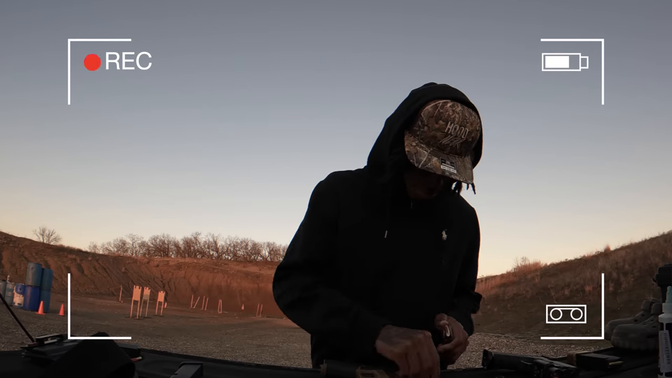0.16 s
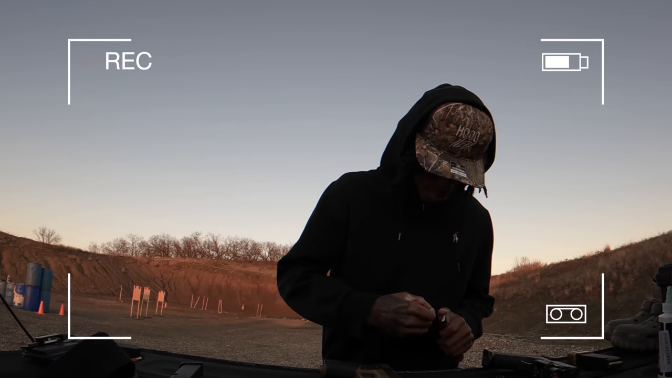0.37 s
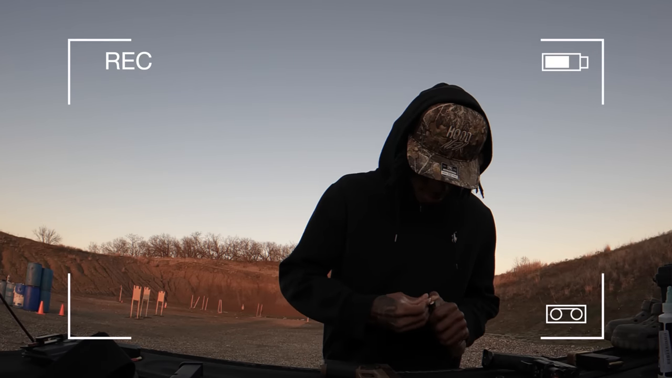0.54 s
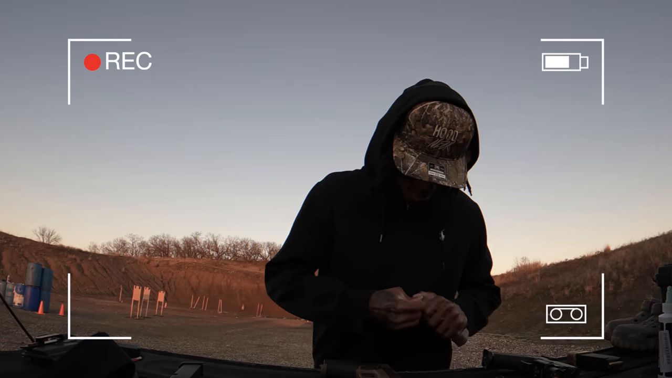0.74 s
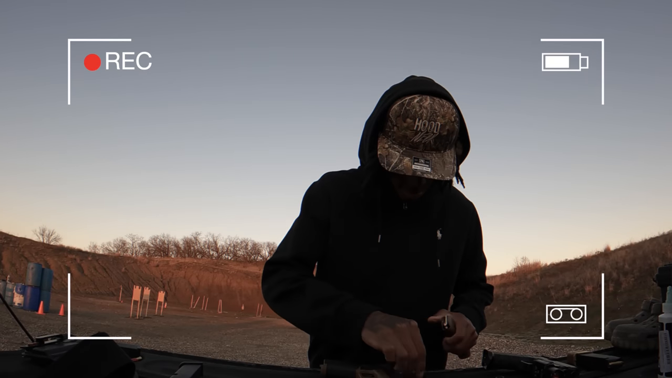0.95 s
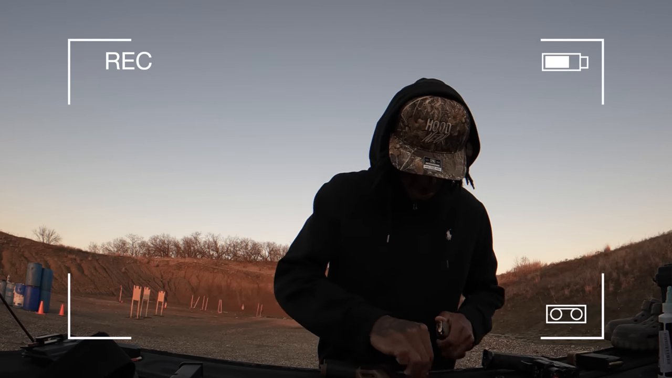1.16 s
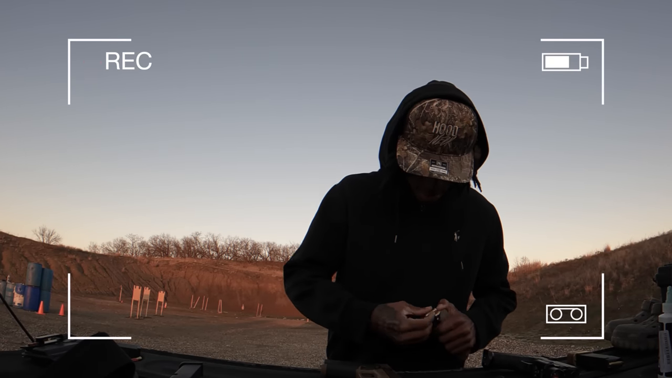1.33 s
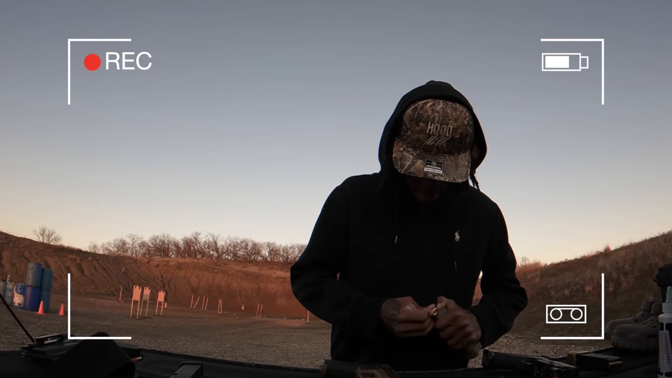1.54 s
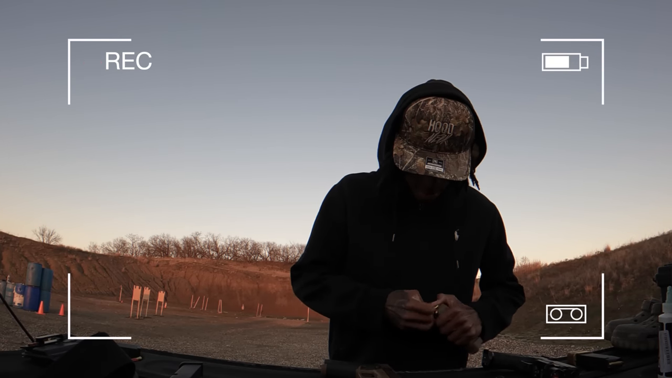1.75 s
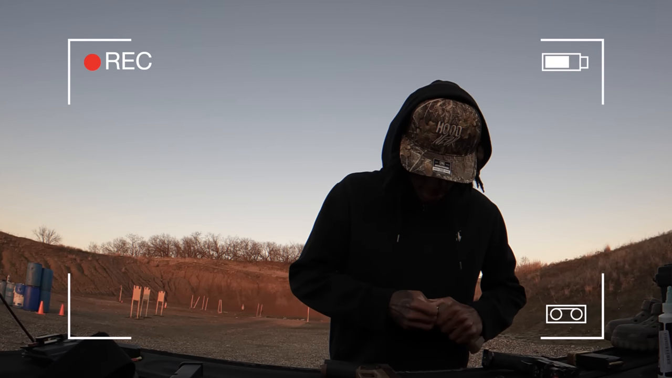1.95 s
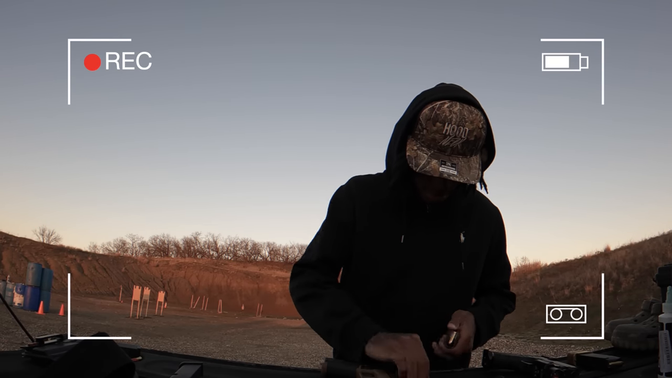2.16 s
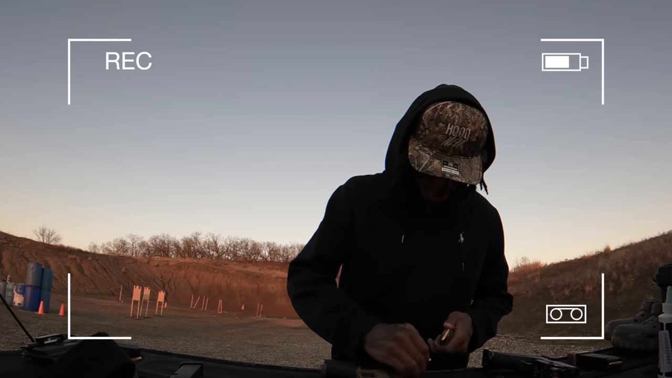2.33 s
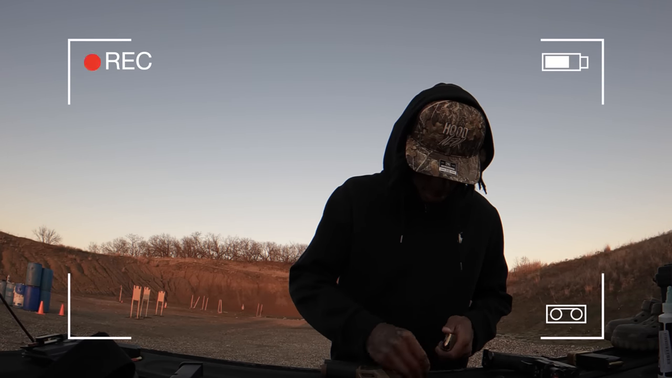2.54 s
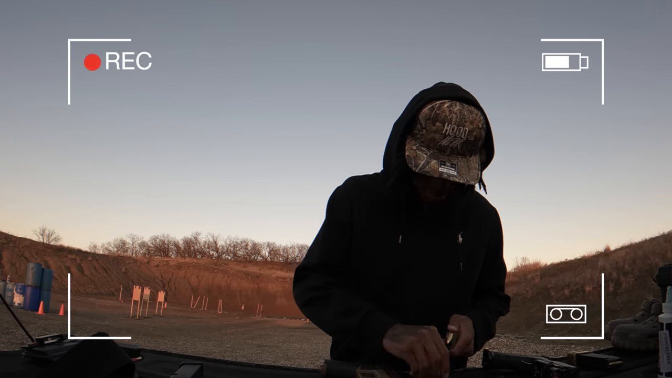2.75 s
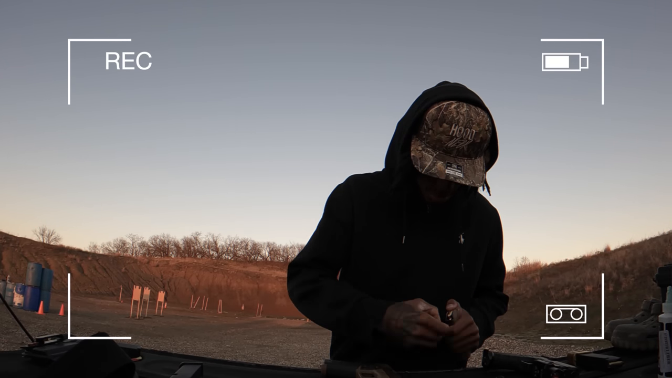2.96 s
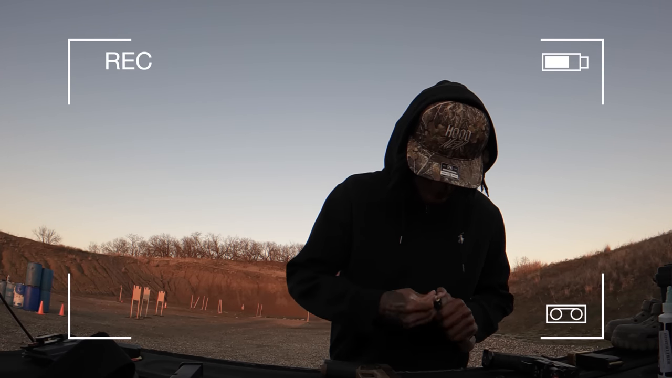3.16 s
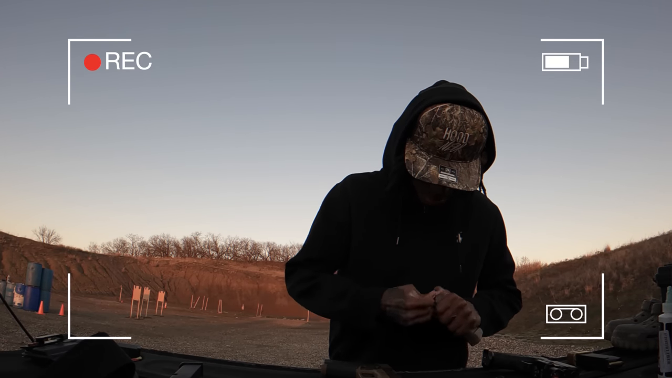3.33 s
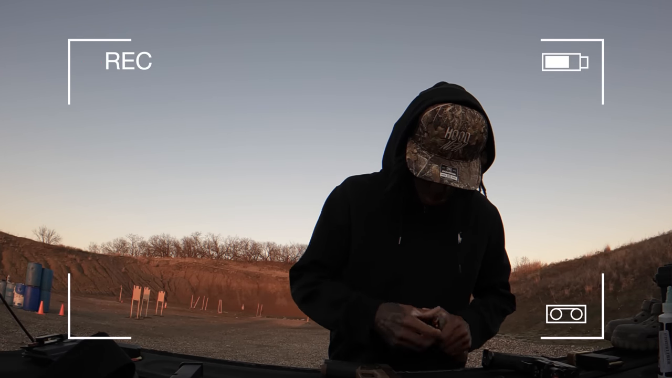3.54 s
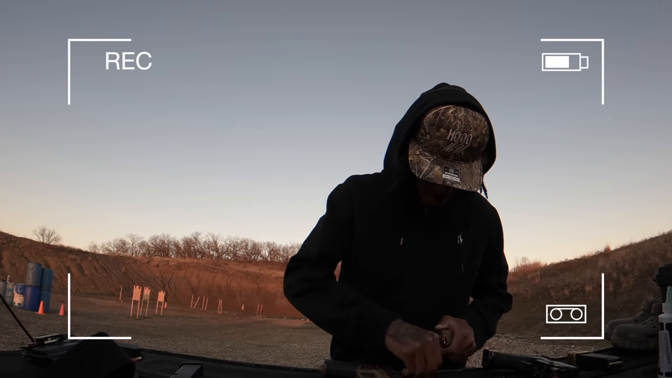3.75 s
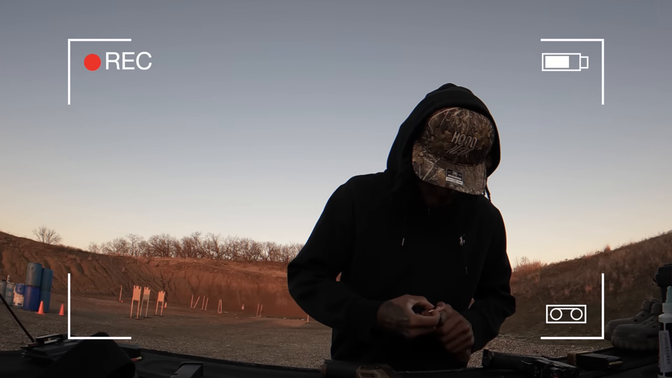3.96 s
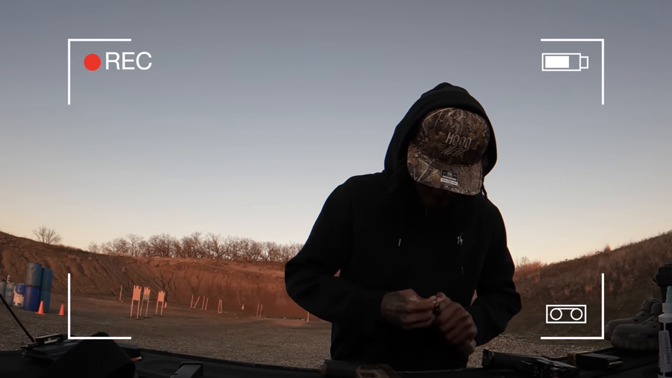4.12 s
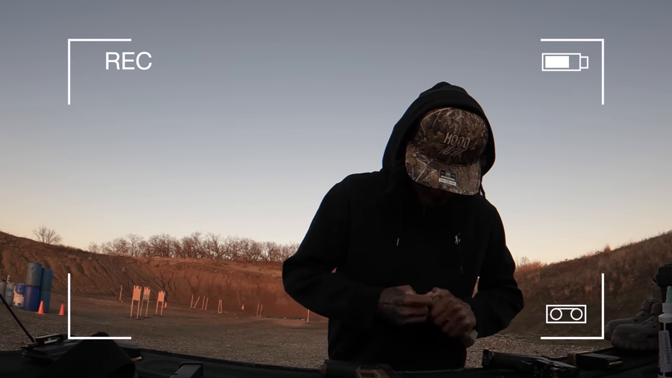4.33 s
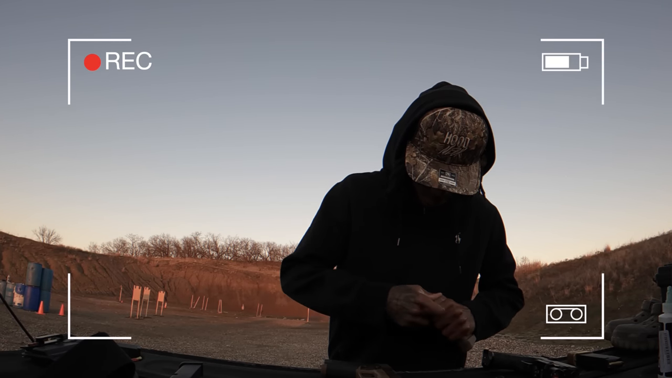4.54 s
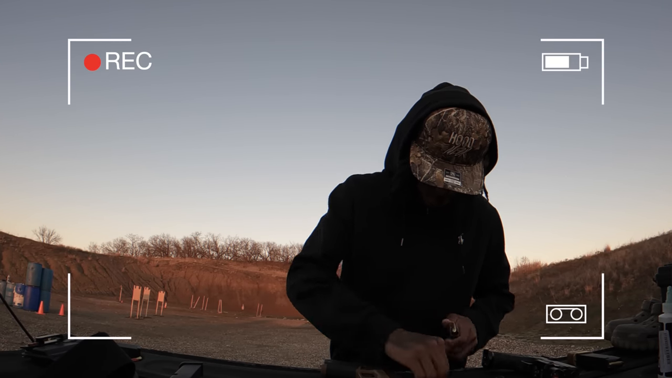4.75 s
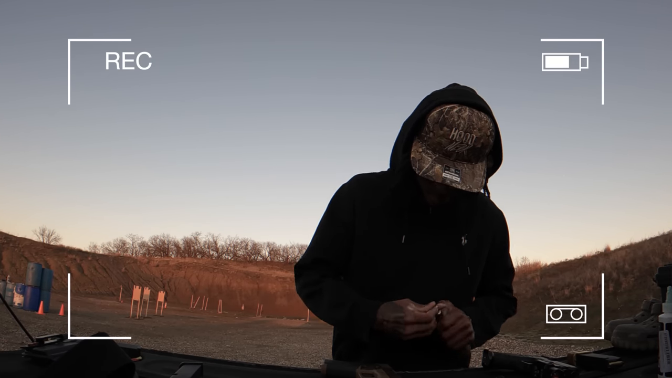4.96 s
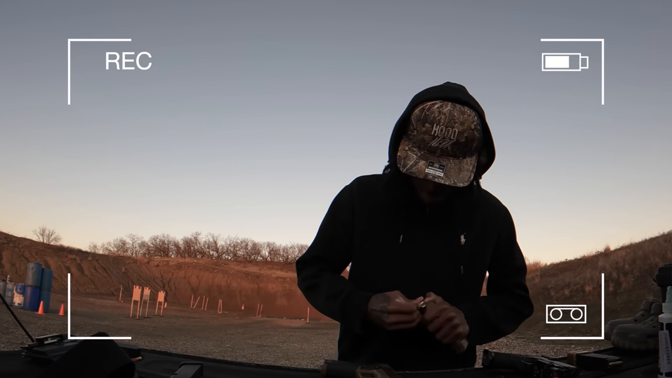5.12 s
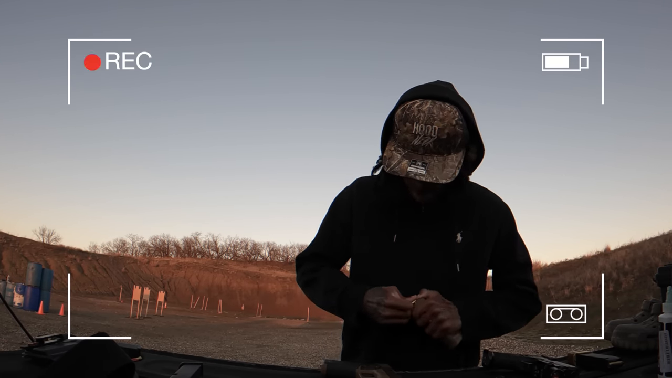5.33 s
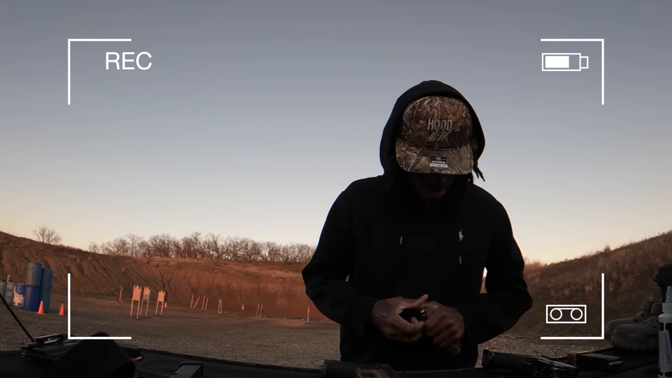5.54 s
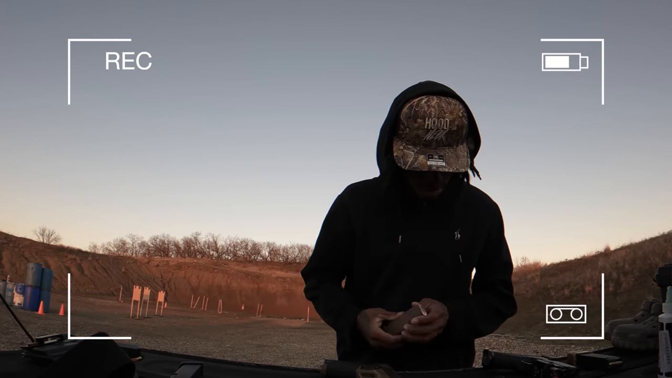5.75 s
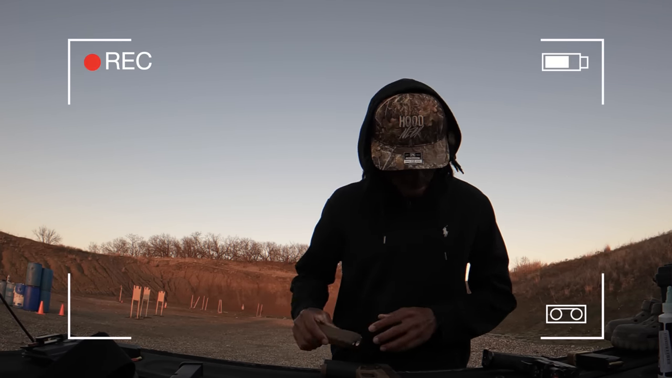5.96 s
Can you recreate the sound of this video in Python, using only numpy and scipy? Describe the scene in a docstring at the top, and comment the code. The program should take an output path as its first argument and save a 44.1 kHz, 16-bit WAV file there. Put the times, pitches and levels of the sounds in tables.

```python
"""Outdoor range, one microphone on a hollow truck bed, close to hands loading a pistol magazine.
From the start, low air rumble, a small engine far off and a faint cricket trilling with short pauses.
Cartridges are thumbed in one by one: brass scrapes along the feed lips and snaps in. Between rounds
the hand fetches the next one and knocks on the bed. The loudest knock and snap land together near
2.6 s; lighter ones follow, and the last ticks of brass come just before 6 s."""
import sys
import numpy as np
from scipy import signal
from scipy.fft import rfft, irfft, next_fast_len
from scipy.io import wavfile
from scipy.ndimage import uniform_filter1d

SR = 44100
rng = np.random.default_rng(int(sys.argv[2]) if len(sys.argv) > 2 else 0)


def inscribe(sig):
    """Save sig as 16-bit PCM at rate SR to the path in sys.argv[1].

    A 1-D sig is mono; a 2-D sig holds one channel per row.
    Samples are clipped to [-1, 1] before scaling.
    """
    pcm = np.round(np.clip(np.atleast_2d(sig).T, -1, 1) * 32767)
    wavfile.write(sys.argv[1], SR, pcm.astype(np.int16))


N = 264024
T = np.arange(N) / SR

# rumble of the open air: f/Hz, relative level/dB
AIR_SPECTRUM = [(10, -12.5), (22, 3), (45, 1), (80, 4), (100, -0.5), (130, -7), (200, -12), (350, -18.5),
                (430, -25.5), (560, -36), (1500, -49.5), (3500, -68), (7000, -75), (15000, -82)]
# soft rush in the distance: f/Hz, relative level/dB
RUSH_SPECTRUM = [(200, -26.5), (480, -8), (650, 7), (830, 8), (1050, -2.5), (1400, -7), (2200, -32.5),
                 (5000, -48.5)]
# swells of the rush: peak t/s, level/dB, attack/s, release/s
RUSH_SWELLS = [(0.51, -63.5, 0.07, 0.13), (2.7, -65.5, 0.054, 0.054), (3.55, -71, 0.12, 0.12),
               (4.119, -65.5, 0.072, 0.36)]
# the rush dying down beneath its swells: t/s, level/dB
RUSH_FLOOR = [(0, -75.5), (2.4, -76.5), (3.1, -86), (5.99, -92)]
# firing harmonics of the far engine: multiple, level/dB
ENGINE_HARMONICS = [(1, -61.5), (2, -62.5), (3, -55), (4, -62), (5, -76.5), (6, -85)]
# middle of each pause in the cricket's trill: t/s
CRICKET_PAUSES = [1.052, 1.518, 2.134, 2.5, 2.962, 3.332, 4.031, 4.995, 5.405, 5.97]
# resonance of the cricket's wing: f/Hz, relative level/dB
WING_SPECTRUM = [(3900, -47), (4400, -11), (4630, 3), (4870, 7.5), (5120, -21), (5700, -37.5)]
# skin and cloth rubbing: f/Hz, relative level/dB
RUB_SPECTRUM = [(400, -11.5), (900, 3), (2500, 1), (4000, -3.5), (7000, -5.5), (9000, -15.5),
                (12500, -23), (16000, -43.5)]
# fingers tightening on a round: peak t/s, relative level/dB
FINGER_GRIPS = [(0.02, -76), (0.57, -74), (0.72, -76), (0.87, -68.5), (1.6, -80.5), (2.0, -74.5),
                (2.14, -86), (3.13, -84.5), (3.48, -77.5), (4.3, -81.5), (4.63, -74), (5.31, -80.5),
                (5.55, -77.5), (5.8, -76.5)]
# knocks on the bed: t/s, relative level/dB, hardness/(dB per octave), favoured f/Hz,
# ring time as a share of the free bed's, number of rebounds
BED_KNOCKS = [(0.23, -27, -6, 150, 0.9, 0), (0.248, -26.5, -3.5, 170, 1.1, 2),
              (0.331, -36.5, -6, 410, 0.78, 0), (0.359, -37.5, -6.5, 320, 1.03, 0),
              (1.096, -32, -6, 170, 0.34, 0), (1.116, -34, -4, 780, 0.84, 0),
              (1.151, -29.5, -3, 780, 0.47, 0), (1.162, -22, -4.5, 694, 0.74, 2),
              (1.316, -38.5, -5, 294, 0.74, 0), (1.378, -37, -6.5, 207, 0.77, 0),
              (1.946, -47.5, -6.5, 408, 1.4, 0), (2.206, -29.5, -5.5, 286, 0.96, 2),
              (2.264, -29.5, -5, 780, 0.65, 0), (2.582, -15.5, 0.07, 1400, 0.73, 0),
              (2.594, -16, -0.9, 200, 0.54, 1), (2.631, -22.5, -3.5, 1000, 0.9, 0),
              (2.858, -39, -4, 1370, 1.1, 0), (2.867, -26, -3.5, 148, 0.93, 0),
              (2.902, -43, -2, 1490, 1.03, 0), (2.944, -41.5, -9.5, 408, 0.86, 0),
              (3.699, -30, -6, 720, 1.07, 0), (3.726, -34, -4, 660, 0.88, 0),
              (4.753, -32, -3, 480, 0.85, 0), (4.765, -24, -6, 480, 0.62, 1)]
# modes of the bed: f/Hz, relative level/dB
PANEL_MODES = [(168, -0.5), (200, 1.5), (294, 2.5), (328, -3.5), (403, -2.5), (461, -6), (587, 0),
               (624, -10), (810, 0), (864, -4), (1005, -3.5), (1164, -7.5), (1305, -8.5), (1404, -9.5),
               (1504, -5.5), (1836, -17.5), (1975, -16), (2250, -9)]
# dense rattle of the bed's panels: f/Hz, relative level/dB
PANEL_SPECTRUM = [(40, -45.5), (115, -21), (175, -3), (320, -2), (600, 0), (1000, -6), (1500, -12),
                  (2400, -11.5), (3900, -18), (6000, -18.5), (7500, -24), (8800, -43.5), (15000, -57)]
# ring time of the free bed: f/Hz, t60/s
PANEL_T60 = [(150, 0.15), (700, 0.16), (2000, 0.13), (6000, 0.052)]
# modes of the hand-held magazine: f/Hz, relative level/dB, t60/s
MAGAZINE_MODES = [(800, -3.5, 0.032), (1300, -13.5, 0.017), (1905, -4.5, 0.019), (2450, -6, 0.018),
                  (3029, -4, .028), (4080, -2, 0.013), (4640, 2.5, 0.015), (5100, -2.5, 0.022),
                  (5690, -8.5, 0.031), (6480, -6, 0.012), (7190, -5.5, 0.018), (8800, -13, .008),
                  (12400, -19.5, .012)]
# crack of brass meeting the magazine: f/Hz, relative level/dB
CRACK_SPECTRUM = [(150, -25), (550, -14.5), (830, -0.5), (1400, -7), (2700, -1), (3500, -3), (4600, 0),
                  (6800, -7.5), (7800, -11.5), (9500, -13), (11000, -19.5), (13000, -23), (16000, -37)]
# a case sliding without snapping in: start t/s, length/s, relative level/dB
LONE_SLIDES = [(0.002, 0.029, -46.5), (0.582, 0.034, -69), (0.683, 0.022, -67), (0.85, 0.032, -55),
               (4.628, 0.029, -67)]
# snaps and ticks of brass: t/s, relative level/dB, brightness/(dB per octave), favoured f/Hz,
# relative level of the slide around it/dB
BRASS_CLICKS = [(0.0376, -37, 2.5, 1770, -79), (0.2484, -47.5, 0, 7500, -66), (0.536, -47, 0, 1830, -66.5),
                (0.632, -43.5, 3.5, 3260, -67), (0.812, -34.5, 5.5, 5230, -52.5),
                (0.8249, -38, -2, 1910, -55), (0.9077, -39.5, -3, 8400, -58.5), (1.15, -42, 1, 1440, -56.5),
                (1.4071, -47, 2.5, 1920, -66.5), (1.522, -62.5, 5, 1430, -80), (1.725, -61, 1.5, 1420, -71),
                (1.9077, -32.5, -4, 2380, -72), (1.9166, -44, -3, 2030, -70),
                (2.018, -42, 0.5, 4000, -52.5), (2.0244, -43.5, -1.5, 3940, -65),
                (2.0837, -51, -7, 870, -64), (2.2034, -50, -3, 1430, -66.5), (2.5828, -23, -4.5, 5900, -57),
                (3.103, -52, -0.5, 5300, -67), (3.2576, -63, -0.5, 5000, -77), (3.357, -65, 0.5, 1430, -78),
                (3.4191, -36, 4.5, 3860, -58), (3.428, -44.5, -4, 6500, -78),
                (3.537, -40.5, 2, 4330, -56.5), (3.5558, -51.5, 2, 1815, -68),
                (4.0243, -62.5, -6, 3600, -68.5), (4.3226, -45, 2.5, 6720, -67),
                (4.486, -45, -6, 920, -61.5), (4.5467, -52.5, -2.5, 2510, -65.5),
                (4.5728, -47.5, 0, 2900, -74), (4.5874, -31.5, 0, 2730, -67),
                (5.295, -53.5, 3, 7700, -63.5), (5.4093, -46.5, -3, 2480, -70), (5.486, -42, -2, 2320, -55),
                (5.508, -37.5, 0.5, 2720, -59.5), (5.5671, -61, 2.5, 4330, -71.5),
                (5.7996, -56, -6, 2060, -75.5)]


def undb(db):
    """Decibels to gain."""
    return 10 ** (np.asarray(db) / 20)


def unit(x):
    """Scale to rms 1."""
    return x / np.sqrt(np.mean(x ** 2))


def at_level(x, db, size):
    """Scale x so that its first size samples have an rms level of db."""
    return x * undb(db) / np.sqrt(np.mean(x[:size] ** 2))


def add(out, s, x):
    """Mix x into out from time s."""
    i = max(int(s * SR), 0)
    out[i:i + len(x)] += x[:N - i]


def on_log_axis(points, hz):
    """Rows of (f/Hz, value) read on a log-frequency axis."""
    freqs, values = np.transpose(points)
    return np.interp(np.log(np.maximum(hz, 1)), np.log(freqs), values)


def colour(x, points):
    """Minimum-phase filter through rows of (f/Hz, level/dB)."""
    size = 2 * next_fast_len(len(x))
    hz = np.arange(size // 2 + 1) * SR / size
    cepstrum = irfft(np.log(undb(on_log_axis(points, hz))))
    cepstrum[1:size // 2] *= 2
    cepstrum[size // 2 + 1:] = 0
    return irfft(rfft(x, size) * np.exp(rfft(cepstrum)))[:len(x)]


def tilt(x, slope, low_hz, high_hz):
    """Lean the spectrum by slope dB per octave between two corners."""
    return colour(x, [(low_hz, 0), (high_hz, slope * np.log2(high_hz / low_hz))])


def favour(x, hz, db, q):
    """Lift one resonance by db."""
    return x + (undb(db) - 1) * signal.lfilter(*signal.iirpeak(hz, q, fs=SR), x)


def noise(points, size=N):
    """Coloured noise of rms 1."""
    return unit(colour(rng.standard_normal(size), points))


def drift(rate_hz):
    """Smooth random wavering of rms 1."""
    hold = int(SR / rate_hz)
    steps = np.repeat(rng.standard_normal(N // hold + 1), hold)
    return unit(uniform_filter1d(uniform_filter1d(steps, hold), hold)[:N])


def fade(t, t60):
    """Exponential decay, 60 dB down at t60."""
    return np.exp(-np.log(1000) * t / t60)


def swell(peak_s, attack_s, release_s):
    """Exponential rise to 1 and fall."""
    return np.exp(-np.maximum((peak_s - T) / attack_s, (T - peak_s) / release_s).clip(0, 30))


def slips(size, per_s, spread_db):
    """Random tiny impulses, a few much stronger than the rest."""
    hits = rng.random(size) < per_s / SR
    return hits * undb(spread_db * rng.exponential(size=size)) * rng.choice([-1, 1], size)


def ring(modes, t, detune, scatter_db=0):
    """Damped modes; each blow draws their signs, a slight detuning and any scatter in level."""
    hz, db, t60 = np.transpose(modes)[:, :, None]
    weight, mistuning, polarity = rng.standard_normal((3, len(modes), 1))
    envelopes = np.sign(polarity) * undb(db + scatter_db * weight) * fade(t, t60)
    return np.sum(envelopes * np.sin(2 * np.pi * hz * (1 + detune * mistuning) * t), axis=0)


def air(rumble_db=-46.5):
    """Low rumble of the open range, wavering a little, and a soft rush from far away."""
    rumble = noise(AIR_SPECTRUM) * undb(rumble_db + drift(11))
    floor = undb(np.interp(T, *np.transpose(RUSH_FLOOR)))
    swells = sum(undb(db) * swell(s, attack, release) for s, db, attack, release in RUSH_SWELLS)
    rush = noise(RUSH_SPECTRUM) * (floor + swells) * undb(2 * drift(29))
    return rumble + rush


def engine(firing_hz=77.37, wander=0.009, sway_db=2):
    """A far engine at nearly steady speed; only its low firing harmonics carry to the microphone."""
    phase = 2 * np.pi * np.cumsum(firing_hz * (1 + wander * drift(10))) / SR
    hum = np.zeros(N)
    for multiple, db in ENGINE_HARMONICS:
        amplitude = np.sqrt(2) * undb(db + sway_db * drift(6))
        hum += amplitude * np.sin(multiple * phase + 2 * np.pi * rng.random())
    return hum


def cricket(stroke_hz=53, pause_s=0.098, level_db=-81.5):
    """Faint in the background, wing strokes rasp one narrow resonance, in trills with short pauses."""
    singing = np.all([np.abs(T - s) > pause_s / 2 for s in CRICKET_PAUSES], axis=0)
    gate = uniform_filter1d(undb(level_db) * singing, SR // 50)
    phase = 2 * np.pi * np.cumsum(stroke_hz * (1 + 0.11 * drift(6.2))) / SR
    strokes = unit(1 + 0.5 * np.sin(phase))
    return gate * strokes * noise(WING_SPECTRUM)


def fingers(flicker_db=3.2, rest_db=-88, attack_s=0.043, release_s=0.07):
    """Close by, skin and cloth rub unevenly, and each grip makes the magazine creak in tiny ticks."""
    rub = undb(-3) * noise(RUB_SPECTRUM)
    creak = undb(-4) * unit(colour(slips(N, per_s=900, spread_db=2.5), CRACK_SPECTRUM))
    grip = undb(rest_db) + sum(undb(db) * swell(s, attack_s, release_s) for s, db in FINGER_GRIPS)
    return (rub + creak) * grip * undb(flicker_db * drift(83))


def bed_blows(gap_s=0.025, rebound_db=-10.5, fall_db_per_s=18.5, rebound_hz=620):
    """Every contact with the bed: knocks, the rebounds of things they jostle, and a soft shuffle."""
    blows = []
    for s, db, hardness, spot_hz, ring_share, rebounds in BED_KNOCKS:
        blows.append((s, db, hardness, spot_hz, ring_share))
        for k in range(rebounds):
            late = gap_s * (k + 1 + 0.1 * rng.standard_normal())
            hz = rebound_hz * 2 ** rng.uniform(-0.55, 0.89)
            blows.append((s + late, db + rebound_db - fall_db_per_s * late, hardness, hz, ring_share))
    # the shuffle: six dull, fading bumps
    for s, db in zip(np.linspace(1.482, 1.6, 6), np.linspace(-43.5, -48.5, 6)):
        blows.append((s + 0.0029 * rng.standard_normal(), db, -8, 374, 1))
    return blows


def truck_bed(gain_db=-3, rattle_db=-2, rise_s=0.002, softening=0.21):
    """Panels ring under the microphone: soft blows push longer and stay low, hard ones rattle it all."""
    out, t = np.zeros(N), np.arange(SR // 3) / SR
    onset = 880  # samples, about 20 ms
    octave_hz = 125 * 2. ** np.arange(8)
    hz = np.arange(len(t) // 2 + 1) * SR / len(t)
    octave_masks = np.array([on_log_axis(np.c_[octave_hz, w], hz) for w in np.eye(len(octave_hz))])
    octave_t60 = on_log_axis(PANEL_T60, octave_hz)[:, None]
    mode_t60 = on_log_axis(PANEL_T60, np.array(PANEL_MODES)[:, 0])
    for s, db, hardness, spot_hz, ring_share in bed_blows():
        bands = irfft(octave_masks * rfft(noise(PANEL_SPECTRUM, len(t))), len(t))
        # a hand that stays on the panel shortens the ring
        rattle = np.sum(bands * fade(t, ring_share * octave_t60), axis=0)
        modes = ring(np.c_[PANEL_MODES, ring_share * mode_t60], t, detune=0.0026)
        knock = at_level(modes, 0, onset) + at_level(rattle, rattle_db, onset)
        knock *= 1 - np.exp(-t / (rise_s * np.exp(-softening * hardness)))
        knock = favour(tilt(knock, hardness, 130, 6000), spot_hz, db=5, q=2.5)
        add(out, s, at_level(knock, db + gain_db, onset))
    return out


def magazine_contact(t, crack_db=1, crack_t60=0.013, tail_db=-27, tail_t60=0.082):
    """Brass meets the magazine: a crack, hand-damped modes and a faint scatter from things nearby."""
    envelope = fade(t, crack_t60) + undb(tail_db) * fade(t, tail_t60)
    crack = noise(CRACK_SPECTRUM, len(t)) * envelope
    modes = ring(MAGAZINE_MODES, t, detune=0.02, scatter_db=0.5)
    return at_level(modes, 0, size=176) + at_level(crack, crack_db, size=176)


def brass_scrapes(gain_db=-2, lead_s=0.016, slide_s=0.036, lone_brightness=-4.5, lone_hz=2970):
    """Brass sticks and slips along the lips, around each click or alone: a swell of tiny contacts."""
    out, t = np.zeros(N), np.arange(SR // 12) / SR
    slides = [(s - lead_s, slide_s, db, brightness, hz) for s, _, brightness, hz, db in BRASS_CLICKS]
    slides += [(s, length_s, db, lone_brightness, lone_hz) for s, length_s, db in LONE_SLIDES]
    for s, length_s, db, brightness, spot_hz in slides:
        size = int(length_s * SR)
        friction = slips(len(t), per_s=2400, spread_db=3)[:size] * np.hanning(size)
        scrape = signal.fftconvolve(friction, magazine_contact(t))
        scrape = favour(tilt(scrape, brightness, 980, 11000), spot_hz, db=9, q=10)
        add(out, s, at_level(scrape, db + gain_db, size))
    return out


def brass_snaps(gain_db=-6.5, rise_s=0.00023, bounce_s=0.0022, bounce_db=-10, creep_db=-24):
    """Close up, the rim creeps, jumps the feed lips and bounces; light touches are softer and duller."""
    out, t = np.zeros(N), np.arange(SR // 8) / SR
    lead, onset = SR // 120, SR // 250  # samples of creep, samples that set the level
    lead_s = lead / SR
    loudest_db = max(row[1] for row in BRASS_CLICKS)
    for s, db, brightness, spot_hz, _ in BRASS_CLICKS:
        lightness = loudest_db - db
        attack = 1 - np.exp(-t / (rise_s * np.exp(0.017 * lightness)))
        jump = magazine_contact(t) * attack
        friction = slips(lead, per_s=9500, spread_db=3.5) * np.linspace(0, 1, lead) ** 2
        creep = signal.fftconvolve(friction, magazine_contact(t))
        snap = np.zeros(2 * len(t))
        add(snap, 0, at_level(creep, creep_db, lead))
        add(snap, lead_s, at_level(jump, 0, onset))
        bounce_at = lead_s + bounce_s * rng.uniform(0.72, 0.92)
        add(snap, bounce_at, at_level(magazine_contact(t), bounce_db, onset))
        snap = colour(snap, [(8000, 0.0028), (15000, -0.2 * lightness)])
        snap = favour(tilt(snap, brightness, 910, 11000), spot_hz, db=11, q=12)
        add(out, s - lead_s, snap * undb(db + gain_db) / np.std(snap[lead:lead + onset]))
    return out


def scene():
    """The close handling and the range behind it, all at one microphone on the truck bed."""
    close = truck_bed() + brass_snaps() + brass_scrapes() + fingers()
    background = engine() + cricket() + air()
    return (close + background)[None]


def record(dry, top_hz=15400):
    """The recorder cuts the highest treble steeply."""
    return signal.sosfilt(signal.ellip(8, 0.2, 70, top_hz, fs=SR, output="sos"), dry)


dry = scene()
out = record(dry)
inscribe(out)
```